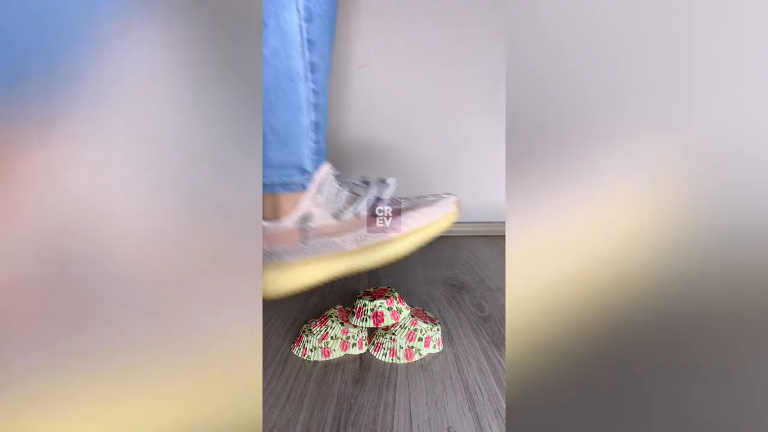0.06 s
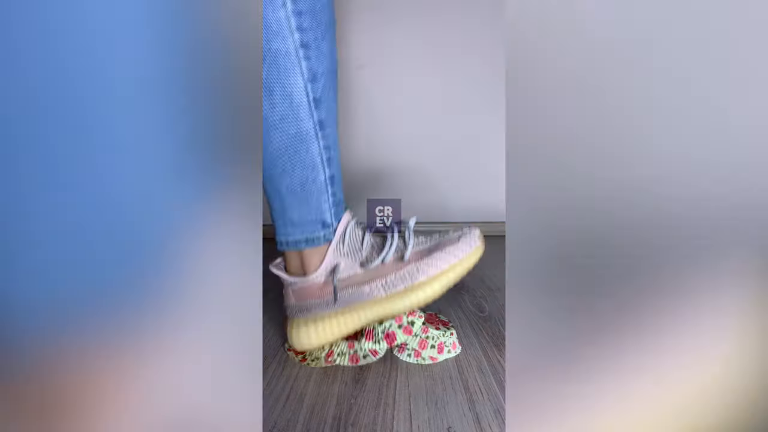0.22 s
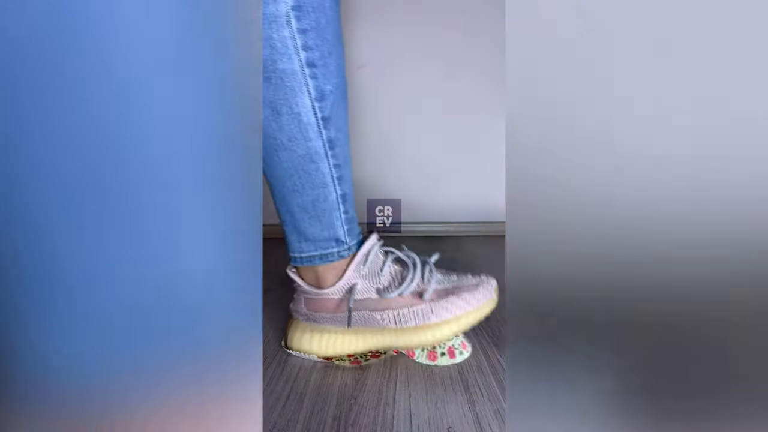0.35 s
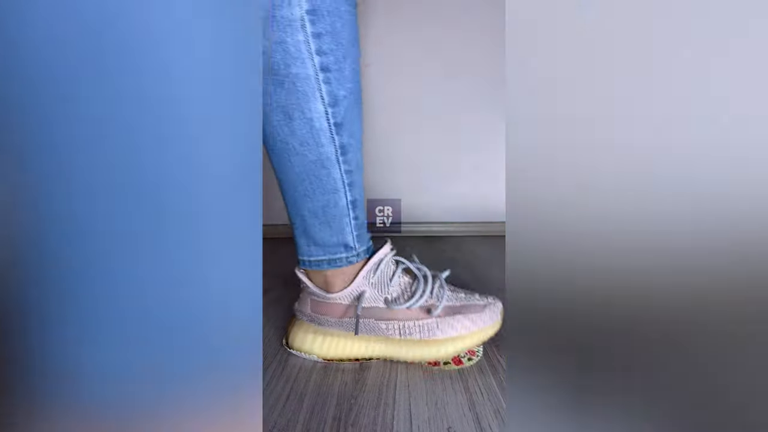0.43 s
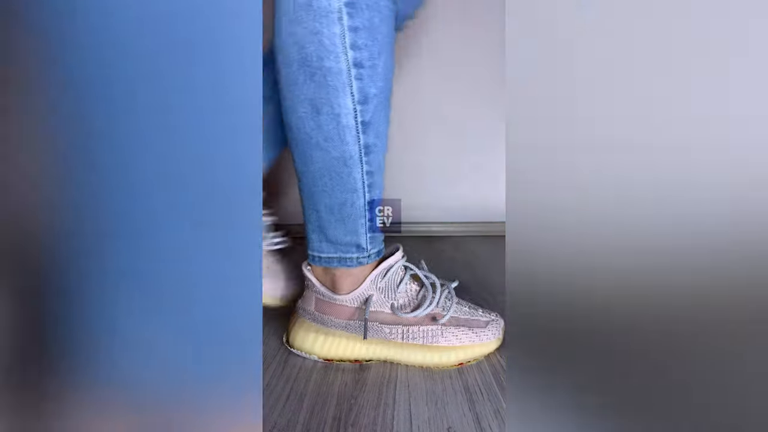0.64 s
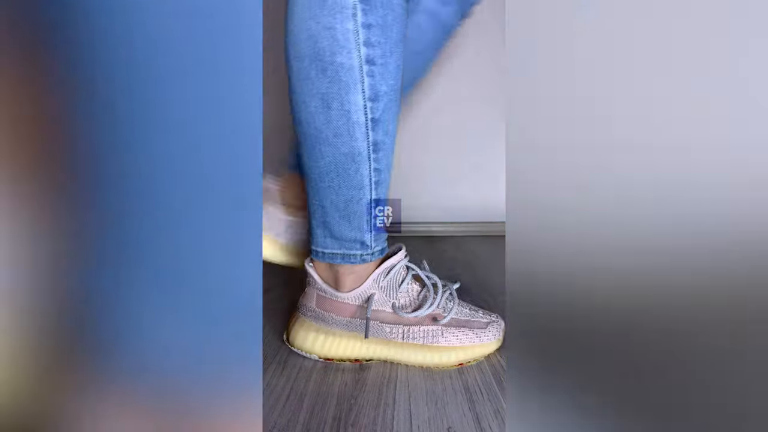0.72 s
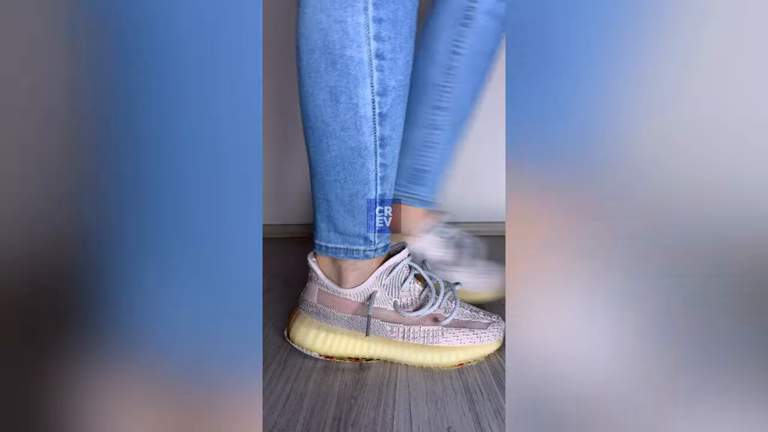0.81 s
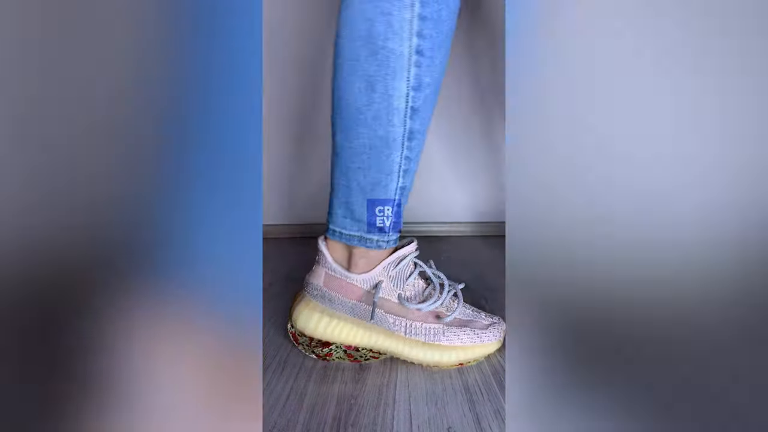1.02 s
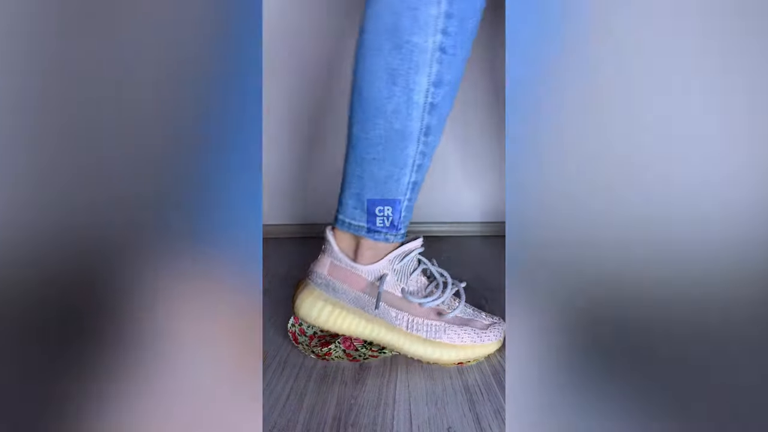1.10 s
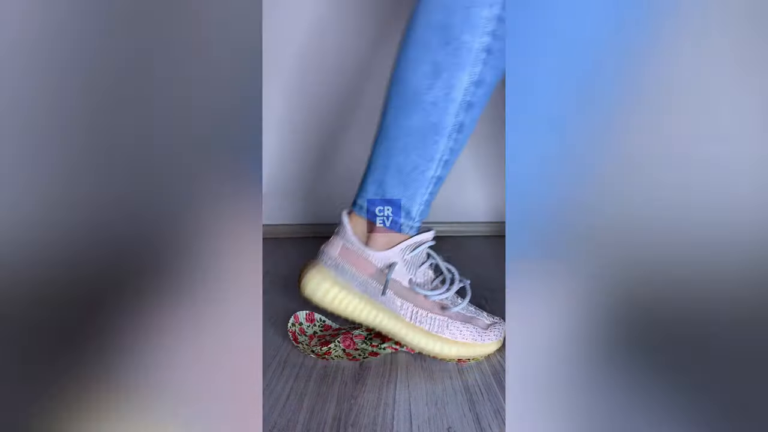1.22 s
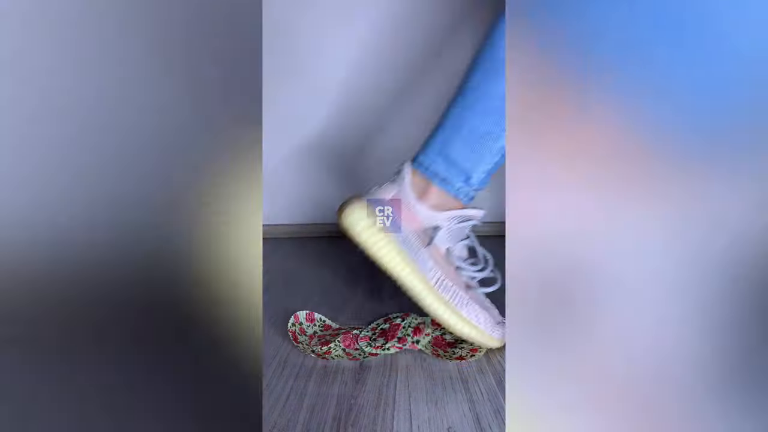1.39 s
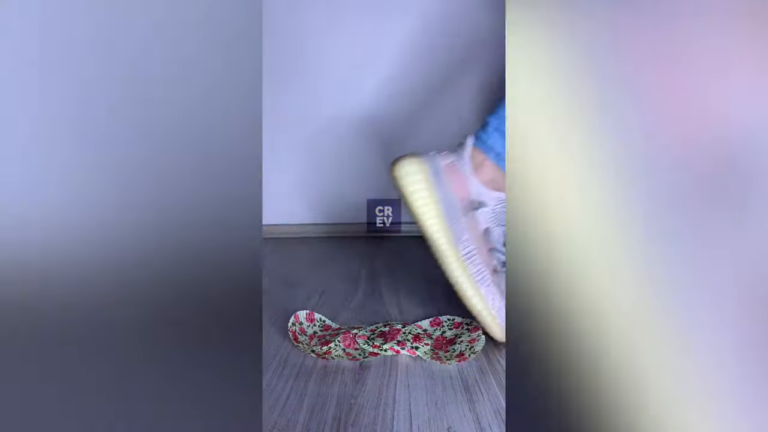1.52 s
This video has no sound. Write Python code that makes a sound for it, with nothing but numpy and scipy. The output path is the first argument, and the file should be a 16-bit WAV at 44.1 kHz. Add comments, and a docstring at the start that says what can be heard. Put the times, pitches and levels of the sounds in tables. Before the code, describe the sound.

A loud, crisp crunch as a sneaker stamps on hollow shells on a wooden floor. Bright shards keep snapping under the sole, then the foot rolls off with dull knocks and faint ticks, heard close in a small room.

```python
"""Sneaker crushing hollow shells

A sneaker stamps on a heap of brittle shells on a wooden floor, close to two microphones in a small room.
The walls cave in with a dense, ringing crunch in two surges, and bright shards go on snapping under the
sole as the weight settles. The foot rolls off with dull knocks on the boards, soft thumps, last ticks
and one small skid, over a low rumble."""
import sys
import numpy as np
from scipy import signal
from scipy.fft import rfft, irfft
from scipy.io import wavfile

SR = 44100
rng = np.random.default_rng(int(sys.argv[2]) if len(sys.argv) > 2 else 0)


def to_wav(sig):
    """Store sig (one row per channel, or 1-D mono) as 16-bit WAV at the path in sys.argv[1].

    Samples outside -1..1 are clipped; the rate is SR.
    """
    pcm = np.clip(np.atleast_2d(sig), -1, 1) * 32767
    pcm = np.round(pcm).astype(np.int16)
    wavfile.write(sys.argv[1], SR, pcm.T)  # frames by channels


N = 68355

# Bright tone of the splintering (frequency [Hz], level [dB])
SPLINTER_TONE = [(100, -44), (1000, -47.5), (2500, -6.5), (3800, 3.5), (4800, -10.5), (6000, -7),
                 (7000, -4), (8300, -8), (10000, -18.5), (12500, -12.5), (16000, -34)]
# Fader ride of the splintering (time [s], level [dB])
SPLINTER_RIDE = [(0.2, -60), (0.207, -37.5), (0.236, -20), (0.281, -19), (.298, -28), (0.32, -24.5),
                 (0.358, -16.5), (0.398, -25.5), (0.453, -22.5), (0.532, -28.5), (.585, -34.5),
                 (.645, -41.5), (.70, -51.5), (0.818, -51), (0.902, -47), (0.959, -58), (1.14, -58.5),
                 (1.175, -41.5), (1.21, -71), (1.258, -49.5), (1.351, -58.5), (1.55, -56.5)]
# Sharp snaps on top of the crunch (time [s], level [dB])
SNAP_HITS = [(0.2147, -17.5), (0.2616, -17), (0.274, -7.5), (0.2795, -11.5), (0.2792, -11), (0.283, -28),
             (.3755, -10), (0.4068, -13.5), (0.432, -22), (0.4422, -9), (0.4702, -11.5), (.5310, -15),
             (.5436, -23.5), (.5634, -19), (0.5926, -18.5), (0.623, -25), (.6490, -29), (0.7457, -27),
             (0.7757, -31.5), (0.8297, -28), (.8688, -27), (.8918, -32), (.9050, -30), (.9105, -35),
             (.9908, -21.5), (1.1156, -39), (1.1710, -28), (1.1812, -35), (1.2403, -34), (1.2555, -32.5),
             (1.3203, -36), (1.3782, -29), (1.3983, -34)]
# Ring of a snapping shard (frequency [Hz], level [dB], decay [s])
SNAP_RING = [(6660, 5.5, 0.00038), (6930, -4, 0.00093), (7460, 7.5, 0.00016), (10800, -9, 0.000084),
             (11950, -18, 0.00029)]
# Noisy edge of a snap (frequency [Hz], level [dB])
SNAP_TONE = [(100, -42.5), (1500, -1), (2500, -3), (4000, 8), (4900, 2), (6200, 3), (8000, 8.5),
             (12500, -4), (16000, -5)]
SNAP_DECAY_S, SHARD_RISE_S = 0.00087, 0.00025

def shards():
    """Shards splinter in a bright spray; single snaps stand out, each a ring plus a tick of noise."""
    out = swarm(SPLINTER_TONE, SPLINTER_RIDE, SNAP_DECAY_S, per_s=5000, spread_db=5.5, detune=0.043)
    for s, db in SNAP_HITS:
        pitch = 1 + 0.014 * rng.uniform(-1.3, 1)
        modes = sum(amp(mode_db) * ping(hz * pitch, decay_s, SHARD_RISE_S)
                    for hz, mode_db, decay_s in SNAP_RING)
        ring = unit(place(modes))
        tick = amp(3) * fracture(SNAP_TONE, pitch, SNAP_DECAY_S)
        add(out, s, db, stutter(ring + tick))
    return out


# Midrange body of a breaking wall (frequency [Hz], level [dB])
WALL_TONE = [(60, -43), (250, -32), (600, -9), (1100, -3), (1350, -2.5), (1520, -4.5), (1700, 0.5),
             (2000, 0.5), (2400, -5), (4000, -16.5), (8000, -35.5), (16000, -24)]
# Fader ride of the crumbling (time [s], level [dB])
CRUMBLE_RIDE = [(0.198, -57), (0.209, -31.5), (0.245, -20.5), (.28, -32.5), (.30, -36), (0.321, -26.5),
                (0.362, -16.5), (0.397, -31.5), (.435, -28), (0.519, -33.5), (0.587, -40.5), (0.679, -60),
                (0.801, -69), (.89, -48.5), (0.958, -66), (1.123, -59), (1.168, -51.5), (1.28, -56),
                (1.362, -64.5), (1.55, -62)]
# Single cracks in the walls (time [s], level [dB], pitch [Hz])
CRACK_HITS = [(0.2184, -14, 1360), (0.239, -11.5, 1410), (0.2498, -9, 1420), (0.2738, -12.5, 1500),
              (0.2765, -9, 1540), (.2810, -6.5, 1446), (0.3352, -7.5, 1445), (0.3581, -11.5, 1140),
              (0.3628, -7, 1406), (0.41, -11.5, 1670), (.4955, -15, 1910), (.4992, -14.5, 2060),
              (0.5159, -12.5, 1520), (0.5188, -15.5, 1840), (0.5234, -14, 1940), (0.527, -35, 1900),
              (0.8729, -43, 1420), (1.3774, -44.5, 1490)]
CRACK_DECAY_S = 0.00096

def shell_walls():
    """The walls crumble and crack; each crack is a pitched flex with a burst of noise."""
    out = swarm(WALL_TONE, CRUMBLE_RIDE, CRACK_DECAY_S, per_s=4000, spread_db=1.5, detune=0.08)
    for s, db, hz in CRACK_HITS:
        flex = place(ping(hz, decay_s=0.00072, rise_s=0.0011))
        burst = amp(-4) * fracture(WALL_TONE, hz / 1500, CRACK_DECAY_S)
        add(out, s, db, flex + burst)
    return out


# Tone of the grit under the sole (frequency [Hz], level [dB])
GRIND_TONE = [(30, -50), (90, -6), (170, 3.5), (240, -10.5), (350, 4.5), (600, -2), (900, -5), (1600, -24),
              (4000, 0.5), (16000, -85.5)]
# Fader ride of the grinding (time [s], level [dB])
GRIND_RIDE = [(0.204, -82), (0.213, -37), (0.235, -24), (0.28, -19), (0.31, -37), (0.356, -19.5),
              (0.424, -34.5), (.47, -31), (0.558, -46), (0.679, -53.5), (.80, -55), (.87, -72.5),
              (1.101, -67.5), (1.166, -39.5), (1.2, -47), (1.25, -45.5), (1.331, -61), (1.399, -82)]
# Dull knocks of pieces on the boards (time [s], level [dB], pitch [Hz], decay [s])
KNOCK_HITS = [(.3570, -8, 685, .0021), (.6524, -23, 1200, .0005), (.6742, -23, 1250, .0005),
              (.6965, -22.5, 1350, .0005), (.7320, -33, 650, .0045), (.7850, -40, 630, .0038),
              (1.0800, -42, 686, .0013), (1.1505, -25, 590, .0048), (1.2170, -30, 1150, .001),
              (1.2205, -31, 620, .003), (1.2398, -27, 1500, .0003), (1.2415, -29, 658, .005),
              (1.2700, -34, 1550, .0005), (1.2712, -33, 644, .0043)]
BOARD_HZ, KNOCK_RISE_S = 157.7, 0.0004

def sole():
    """The sole grinds and knocks pieces against the boards, which answer with a low thud."""
    out = swarm(GRIND_TONE, GRIND_RIDE, decay_s=0.00094, per_s=1500, spread_db=2, detune=0.037)
    for s, db, hz, decay_s in KNOCK_HITS:
        thud = amp(-3) * ping(BOARD_HZ, decay_s=0.006, rise_s=KNOCK_RISE_S)
        knock = ping(hz, decay_s, KNOCK_RISE_S)
        add(out, s, db, place(through_boards(knock + thud)))
    return out


def through_boards(sound, bend_s=0.0008, muffle_hz=2250):
    """Bending waves carry the highs first, a quick downward sweep; the sole muffles the top."""
    hz = np.fft.rfftfreq(len(sound), 1 / SR)
    lag_cycles = bend_s * (2 * np.sqrt(1000 * hz) - hz * np.sqrt(1000 / muffle_hz))
    swept = irfft(rfft(sound) * np.exp(-2j * np.pi * lag_cycles))
    return signal.sosfilt(signal.butter(6, muffle_hz, fs=SR, output="sos"), swept)


# Resonances of the hollow shells (frequency [Hz])
HOLLOW_RING = [843, 996, 1108, 1243, 1352, 1462, 1492, 1545, 1612, 1775, 2000]

def hollow(blows, t60_s=0.12, ring_db=-7):
    """The blows, plus the brief ring they set off in the shells."""
    t = np.arange(SR // 3) / SR
    modes = sum(np.sin(2 * np.pi * (hz * t + rng.random())) for hz in HOLLOW_RING)
    ring = unit(convolve(blows, amp(-60 * t / t60_s) * modes))
    return blows + amp(ring_db) * np.linalg.norm(blows[0]) * ring


# Ring of a loose shard (frequency [Hz], level [dB])
SKID_RING = [(1480, -1), (1920, -12), (2520, 9.5), (5850, 1.5)]

def skid():
    """A loose shard skids as the toe leaves, and the short scrape rings it."""
    out = np.zeros((2, N))
    scrape = noise_burst(decay_s=0.0043)
    ring = sum(amp(db) * unit(convolve(scrape, ping(hz, decay_s=0.00066, rise_s=SHARD_RISE_S)))[0]
               for hz, db in SKID_RING)
    add(out, s=1.526, db=-31, sound=place(ring))
    return out


# Low thumps under the foot (time [s], level [dB], pitch [Hz])
THUMP_HITS = [(0.242, -24, 96.5), (0.301, -21.5, 78), (1.167, -26, 92), (1.247, -32, 101),
              (1.507, -34.5, 149)]

def floor_thumps():
    """The floor gives softly as the foot lands and rolls off, dead centre in the image."""
    out = np.zeros((2, N))
    for s, db, hz in THUMP_HITS:
        thump = ping(hz, decay_s=0.011, rise_s=0.0039, size=4096)
        add(out, s, db, np.array([thump, thump]))
    return out


# Sub-bass tone of the shifting weight (frequency [Hz], level [dB])
WEIGHT_TONE = [(26, -44), (37, -4), (56, -2.5), (85, 1), (130, -25), (200, -28), (300, -58), (1000, -67)]
# Fader ride of that rumble (time [s], level [dB])
WEIGHT_RIDE = [(-.05, -46), (.2, -47.5), (.35, -51), (.48, -49), (.55, -59), (.66, -42.5), (.89, -60.5),
               (1.14, -60), (1.29, -45.5), (1.42, -78)]

def weight_rumble():
    """A deep rumble swells and sinks as the weight shifts."""
    return fader(WEIGHT_RIDE) * noise_bed(WEIGHT_TONE)


# Reverb time of the small room (frequency [Hz], T60 [s])
ROOM_DECAY = [(100, 0.05), (500, 0.36), (1500, 0.38), (7000, 0.49), (14000, 0.12)]

def reflections(breaks, crush):
    """Floor and wall throw back the breaks at once; the whole crush feeds a wider room tail."""
    early = convolve(breaks, echoes([(1, 0.05)], width=0.45))  # 50 ms T60 in every band
    late = convolve(crush, echoes(ROOM_DECAY, width=0.8))
    return amp(-9) * early + amp(-12) * late


def echoes(t60_curve, width, size=256):
    """Dense reflections dying away by band, after a 2 ms pre-delay."""
    hz, t, (mid, side) = signal.stft(rng.standard_normal((2, SR // 2)), SR, nperseg=size)
    side = side * (width * hz / (hz + 600))[:, None]  # the bass stays centred
    decay = amp(-60 * t / at_hz(t60_curve, hz)[:, None])
    tail = signal.istft(np.array([mid + side, mid - side]) * decay, SR, nperseg=size)[1]
    return unit(tail * (np.arange(tail.shape[1]) / SR > 0.002))


# Background of the room (frequency [Hz], level [dB])
ROOM_TONE = [(40, -35), (100, -17.5), (145, 5), (176, 0), (205, -14.5), (260, -7.5), (500, -46),
             (1500, -28), (3000, -41), (7000, -36.5), (16000, -55.5)]

def room_tone():
    """A faint, steady, low bed of noise."""
    return amp(-57.5) * noise_bed(ROOM_TONE)


def swarm(tone, ride, decay_s, per_s, spread_db, detune, pieces=24):
    """Many tiny breaks of uneven size and pitch: a crunch when loud, a rustle when faint."""
    chance = per_s / SR
    sizes = amp(spread_db * np.minimum(rng.exponential(1, N), 3))
    sizes /= np.sqrt(np.mean(sizes ** 2) * chance)  # unit power ahead of the fader
    fires = rng.random(N) < chance
    clicks = sizes * fires * fader(ride) * rng.choice([-1, 1], N)
    piece = rng.integers(0, pieces, N)
    return sum(convolve(clicks * (piece == k), fracture(tone, np.exp(detune * step), decay_s))
               for k, step in enumerate(np.linspace(-1, 1, pieces)))


def fracture(tone, pitch, decay_s):
    """One break: a sudden release and a ragged run of the crack, coloured by the piece."""
    run = 2 * unit(noise_burst(decay_s))
    run[0] += 1  # the release
    return unit(place(convolve(run, colour(tone, pitch))[0]))


def stutter(sound, count=3, gap_s=0.00045, step_db=-5):
    """A break gives way in a few quick jerks, each weaker than the last."""
    at = np.cumsum(gap_s * SR * (0.5 + rng.random(count))).astype(int)
    jerks = np.zeros(at[-1] + 1)
    jerks[at - at[0]] = amp(step_db * np.arange(count)) * rng.choice([-1, 1], count)
    return convolve(sound, jerks)


def ping(hz, decay_s, rise_s, size=2048):
    """A short damped ring with a soft attack."""
    t = np.arange(size) / SR
    sine = np.sin(2 * np.pi * (hz * t + rng.random()))
    return unit(sine * np.exp(-t / decay_s) * (1 - np.exp(-t / rise_s)))


def noise_burst(decay_s, size=2048):
    """White noise with a hard attack and a fast decay."""
    return rng.standard_normal(size) * np.exp(-np.arange(size) / SR / decay_s)


def noise_bed(tone, width=0.37):
    """Steady coloured noise, nearly the same at both microphones."""
    gain = amp(at_hz(tone, np.fft.rfftfreq(N, 1 / SR)))
    mid, side = irfft(rfft(rng.standard_normal((2, N))) * gain, N)
    return np.sqrt(N) * unit(np.array([mid + width * side, mid - width * side]))


# How far the left microphone leads the right (frequency [Hz], lead [s])
LEFT_LEAD = [(100, 0.000077), (600, 0.00034), (1450, 0.000023), (2300, 0.00013), (4000, 0.00013),
             (14000, 0.00016)]

def place(sound, spread_s=0.000012):
    """Puts a sound somewhere under the shoe: a small lag and level difference between the microphones."""
    lag, pan_db = rng.standard_normal(2)
    size = 2 * len(sound)
    hz = np.fft.rfftfreq(size, 1 / SR)
    delay_s = at_hz(LEFT_LEAD, hz) + spread_s * lag
    right = irfft(rfft(sound, size) * np.exp(-2j * np.pi * hz * delay_s))[:len(sound)]
    return np.array([sound * amp(pan_db), right * amp(-pan_db)])


def colour(tone, pitch=1, size=2048):
    """Minimum-phase impulse response of an EQ curve, transposed by a pitch ratio."""
    hz = abs(np.fft.fftfreq(size, 1 / SR))
    log_gain = np.log(amp(at_hz(tone, hz / pitch)))
    return np.fft.ifft(np.exp(np.conj(signal.hilbert(log_gain)))).real


def add(mix, s, db, sound):
    """Mixes in a hit with the energy of one millisecond at the given level."""
    part = mix[:, round(s * SR):][:, :sound.shape[1]]
    part += amp(db) * np.sqrt(SR / 1000) * unit(sound)[:, :part.shape[1]]


def convolve(x, response):
    """Filters each channel and keeps the length."""
    x = np.atleast_2d(x)
    return signal.fftconvolve(x, np.atleast_2d(response), axes=1)[:, :x.shape[1]]


def fader(ride):
    """Gain at every sample of a ride; silent before its first point."""
    return amp(np.interp(np.arange(N) / SR, *np.transpose(ride), left=-200))


def at_hz(curve, hz):
    """Reads a curve on a log-frequency axis."""
    curve_hz, values = np.transpose(curve)
    return np.interp(np.log(hz + 1), np.log(curve_hz + 1), values)


def unit(x):
    """Scales to an average energy of one per channel."""
    return x / np.sqrt(np.mean(np.sum(x ** 2, -1)) + 1e-20)


def amp(db):
    """Decibels to gain."""
    return 10 ** (np.asarray(db) / 20)


def scene():
    """The mix: the crush up front, its reflections behind, the low end underneath."""
    bright = shards() + skid()
    walls = shell_walls()
    crush = bright + hollow(walls + sole())
    room = reflections(bright + walls, crush)
    return crush + room + floor_thumps() + weight_rumble() + room_tone()


# Overall tone: a narrow dip near 9.5 kHz and a lifted top (frequency [Hz], gain [dB])
OVERALL_EQ = [(20, -3), (8400, 2), (9100, 1.5), (9550, -5.5), (10150, 0), (10700, 7), (14100, 9.5),
              (14800, -3), (16000, -11)]
HIGH_CUT_HZ = 15750

def record(dry):
    """Overall tone colour, a hard clip at full scale and a steep high cut."""
    heard = np.clip(convolve(dry, colour(OVERALL_EQ)), -1, 1)
    high_cut = signal.firwin(511, HIGH_CUT_HZ, window=("kaiser", 9), fs=SR)
    return signal.oaconvolve(heard, high_cut[None], "same")


dry = scene()
out = record(dry)
to_wav(out)
```